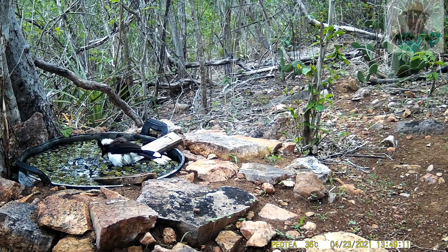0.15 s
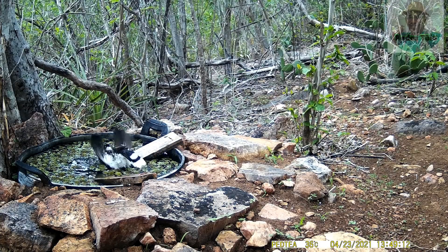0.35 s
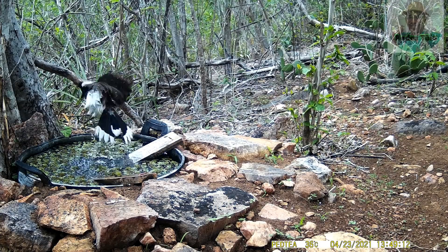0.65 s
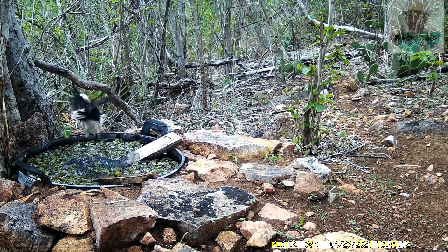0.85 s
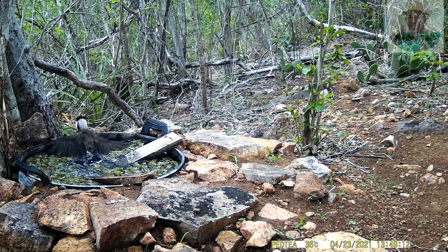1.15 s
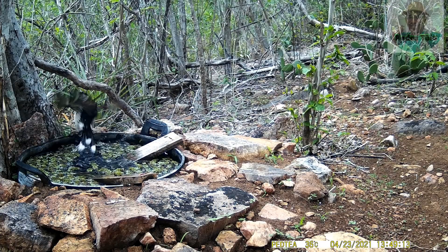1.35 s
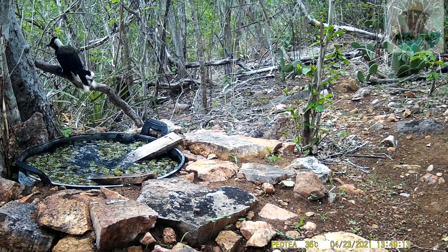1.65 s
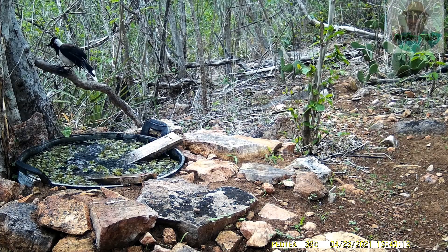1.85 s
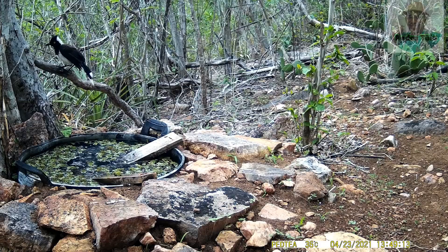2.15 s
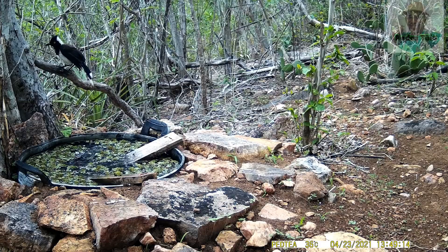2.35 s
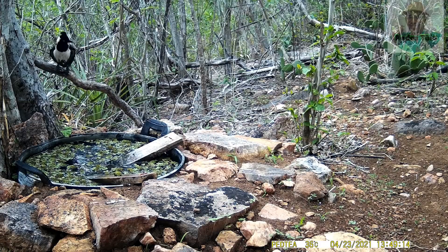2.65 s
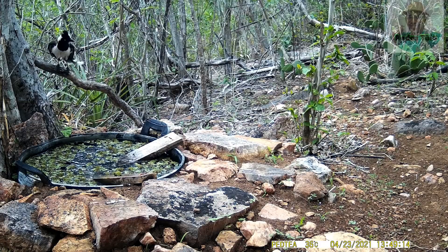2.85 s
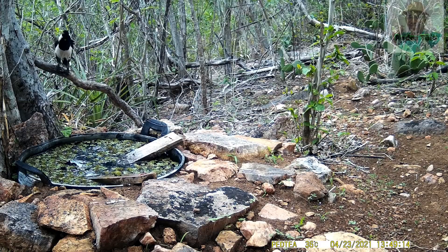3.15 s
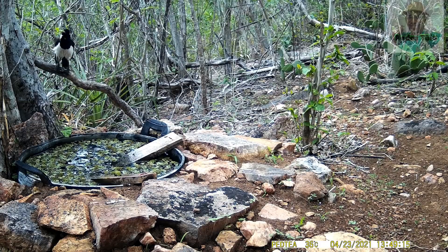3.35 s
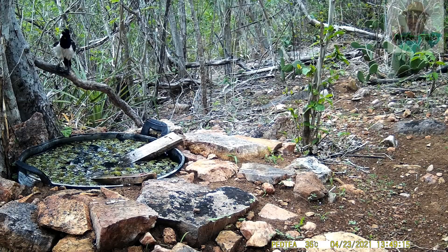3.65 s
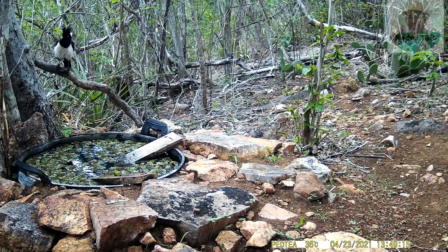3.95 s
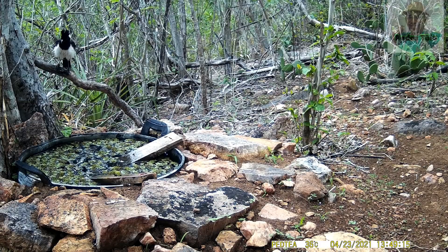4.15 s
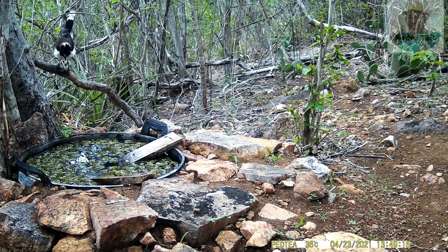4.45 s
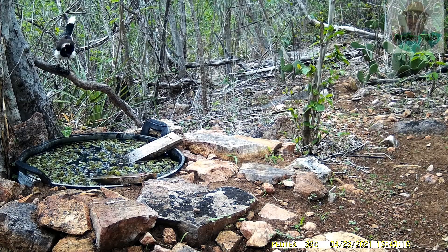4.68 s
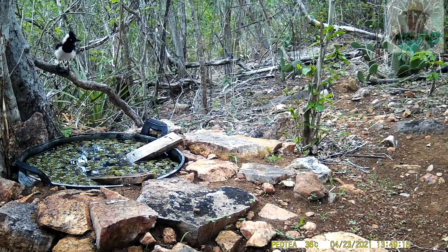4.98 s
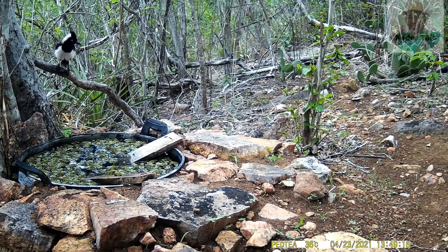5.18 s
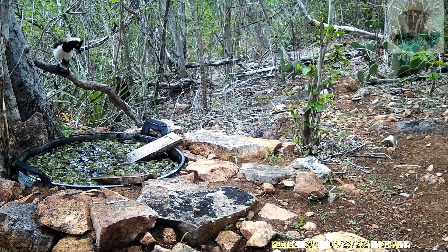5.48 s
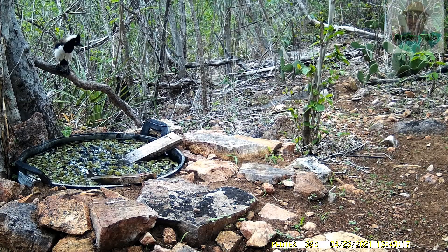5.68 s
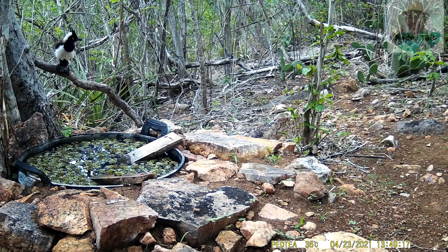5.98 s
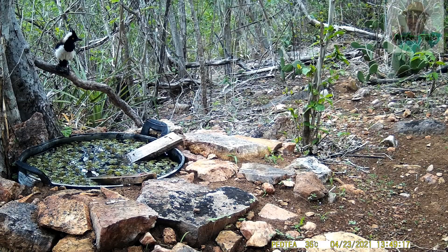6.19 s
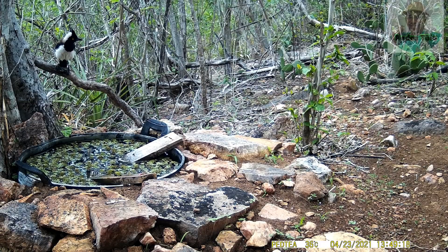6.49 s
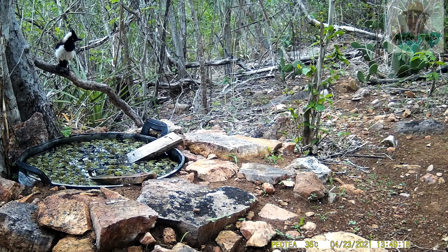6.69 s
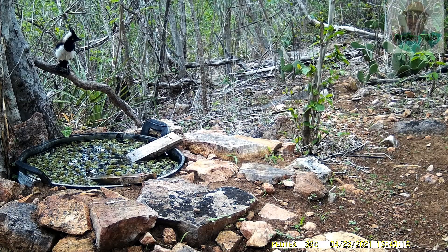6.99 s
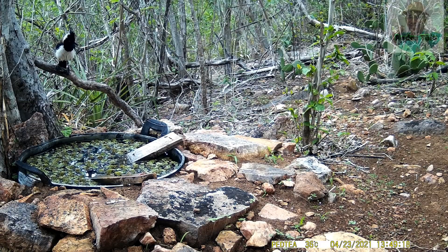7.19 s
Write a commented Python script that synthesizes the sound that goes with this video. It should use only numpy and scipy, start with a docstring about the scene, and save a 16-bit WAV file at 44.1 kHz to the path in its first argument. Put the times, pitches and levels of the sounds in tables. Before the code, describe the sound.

Soft wingbeats and quick watery plops, a quiet windy pause, a faint distant twitter, then two abrupt raspy jay yaps with brief woody echoes.

```python
"""A magpie-jay gives two short, loud yaps: two coupled oscillators whose sum and difference tones mix with rasp.
Before this it splashes out of a water basin in dry scrub: air pockets and small bubbles ring amid droplet noise,
and wingbeats push puffs of shaped noise. A faint twitter of gliding sines repeats until the yaps.
Discrete echoes and decaying diffuse noise stand for the trunks and rocks.
Light wind rumbles on a hissy microphone, and leaves stir softly."""
import sys
import numpy as np
from scipy import signal
from scipy.fft import rfft, irfft, next_fast_len
from scipy.io import wavfile

SR = 44100
rng = np.random.default_rng(int(sys.argv[2]) if len(sys.argv) > 2 else 0)


def wav_out(sig):
    """Save sig, one row per channel (or a flat mono array), as 16-bit PCM at SR to the path in sys.argv[1]."""
    wavfile.write(sys.argv[1], SR, np.round(np.clip(np.atleast_2d(sig).T, -1, 1) * 32767).astype(np.int16))


N = 323099

# Spectra list frequency_hz, relative density_db (power per Hz); the shaped signal is brought to rms 1.
# wind turbulence on the microphone: frequency_hz, density_db
WIND_SPECTRUM = [(12, 2), (22, 1.5), (35, 0.5), (50, -1.5), (80, -19), (130, -21), (300, -30.5), (800, -46)]
# air and microphone hiss, also used for leaves: frequency_hz, density_db
AIR_SPECTRUM = [(35, -43), (60, -3.5), (91, -4), (265, -12), (343, -14.5), (413, -15), (546, -17.5),
                (657, -18), (738, -19.5), (1050, -22), (1630, -23.5), (3840, -27), (12300, -28),
                (15500, -30)]
# air pushed by wings: frequency_hz, density_db
WING_SPECTRUM = [(45, -0.5), (90, -2.5), (200, -10), (500, -23.5), (1500, -27.5), (5000, -34.5)]
# droplets striking water: frequency_hz, density_db
SPRAY_SPECTRUM = [(300, -8), (700, -2), (1300, -4), (2100, -1), (3200, -7), (5000, -5), (8000, -13),
                  (15000, -18)]
# turbulent air in the throat: frequency_hz, density_db
RASP_SPECTRUM = [(300, -3), (850, -12), (1100, 1), (1350, -15), (1850, -5), (2350, 11.5), (3300, 1.5),
                 (5300, 9.5), (6600, -7), (8500, -2), (10500, 1), (12500, -18), (14200, -9), (16000, -20)]

# course of the wind: time_s, relative level_db
WIND_COURSE = [(0.0, -48.5), (0.3, -46.5), (0.35, -35), (0.39, -42), (0.86, -47), (0.96, -37), (1.14, -49),
               (1.16, -41), (1.94, -49), (2.43, -43), (2.9, -53), (3.0, -39), (3.24, -52), (3.38, -36),
               (3.49, -42), (3.57, -34), (4.02, -46.5), (4.1, -30.5), (4.16, -37.5), (4.39, -31.5),
               (4.49, -39), (5.12, -32.5), (5.45, -46), (5.59, -32), (5.63, -37.5), (6.45, -48),
               (6.53, -32), (6.61, -43), (6.71, -26.5), (7.04, -42), (7.18, -44.5), (7.33, -37)]
# soft rushes, like dry leaves stirring: start_s, level_db, attack_s, hold_s, t60_s
LEAF_RUSTLES = [(3.3, -51, 0.09, 0.14, .8), (4.676, -41.5, 0.054, .03, 0.85), (5.55, -51, 0.13, .06, .9),
                (6.7, -44, 0.084, 0.12, 0.77)]
# wingbeats, and wing flicks with the yaps: start_s, level_db
WINGBEAT_TIMES = [(0.526, -38.5), (0.706, -43.5), (0.945, -39.5), (1.166, -37), (1.245, -38), (1.314, -37),
                  (1.417, -41), (1.493, -37), (4.45, -33.5), (4.70, -39.5), (4.76, -38)]
# spray thrown by wings and feet, then shaken off on the perch: start_s, level_db, attack_s, t60_s
SPRAY_BURSTS = [(.615, -46, .012, 0.34), (.72, -50, 0.015, 0.11), (.87, -50.5, 0.05, 0.6),
                (1.10, -45.5, .04, 1), (1.182, -42, .006, .06), (1.25, -38, 0.0064, 0.14),
                (1.42, -46, 0.029, .1), (1.459, -41, .003, .05), (1.49, -45.5, 0.0087, 0.29),
                (2.68, -52, .004, .08), (3.355, -46.5, .004, .07)]
# air pockets in the basin: start_s, level_db, initial pitch_hz, t60_s
AIR_POCKETS = [(1.103, -36, 3520, .01), (1.129, -23.5, 2060, 0.014), (1.135, -30, 1010, 0.033),
               (1.141, -28, 1730, .015), (1.153, -29.5, 1600, .025), (1.163, -17, 713, 0.0098),
               (1.187, -29, 1300, 0.0096), (1.2263, -22, 1940, 0.013), (1.256, -23, 2120, 0.0031),
               (1.285, -33, 1900, .015), (1.385, -38, 2020, .018), (1.49, -34, 2300, 0.02)]
# echoes from ground, rocks and trunks: delay_s, relative level_db
ECHO_PATHS = [(.0085, -27), (0.014, -14.5), (0.0209, -18), (.033, -31), (0.054, -29.5)]
# repeats of the twitter phrase: start_s, strength_db added to each note
TWITTER_REPEATS = [(3.915, -2.5), (4.066, 1.5), (4.211, 0.5), (4.366, 2)]
# notes of the phrase: delay_s, length_s, start_hz, end_hz, relative level_db
TWITTER_NOTES = [(0, .04, 3680, 3580, -51), (0.031, .011, 5000, 4470, -45.5), (.04, .035, 4850, 4900, -56),
                 (.095, 0.027, 3090, 2750, -50)]
# thin slurs into the yaps and a soft one between them: start_s, length_s, start_hz, end_hz, level_db
LEAD_IN_SLURS = [(4.421, 0.011, 6560, 5700, -28.5), (4.425, 0.0085, 5550, 5270, -23),
                 (4.553, 0.028, 2450, 2280, -44), (4.641, 0.015, 5800, 4340, -30)]
# overtones of the low voice: multiple, level_db relative to the low voice
LOW_VOICE_OVERTONES = [(2, -22.5), (3, -22), (4, -35.5), (5, -28), (7, -28), (9, -21)]
# tones from coupled voices: low_multiple, high_multiple, level_db relative to the high voice
COUPLING_TONES = [(-1, 1, -24), (3, -1, -25), (2, 0, -29), (-1, 2, -30), (3, 0, -16), (0, 2, -15),
                  (2, 1, -29), (1, 2, -21.5), (2, 2, -33), (1, 3, -31), (0, 4, -44), (2, 3, -46),
                  (1, 4, -30), (2, 4, -25)]
# yaps: start_s, length_s, base low_hz, base high_hz, first_half_strength_db, second_half_strength_db,
# relative constant_rasp_db
YAP_CALLS = [(4.4332, 0.049, 1571, 2651, 0, 0.5, -28.5), (4.6523, 0.063, 1536, 2617, -5.5, -1.5, -35.5)]
# strokes of every yap (both voices, high, low, both again): delay_s, attack_s, hold_s, t60_s,
# relative low_voice_db, high_voice_db, sum_tone_db, rasp_db; high_pitch_lift (share)
YAP_STROKES = [(0, 0.0027, .008, 0.02, -19.5, -6, -8.5, -22, 0.022),
               (.008, .003, 0.01, .02, -26, -8.5, -24, -38, 0.023),
               (0.023, .006, .003, .08, -8, -33, -26, -42, .025),
               (0.045, 0.002, 0.0028, .05, -15.5, -12, -7.5, -31, 0.048)]

TIME = np.arange(N) / SR
AIR_DB = -45  # steady air and microphone hiss, before its flicker
DOWNSTROKE_S = 0.052
BUBBLES_PER_S, BUBBLE_CYCLES, BUBBLES_DB = 250, 16, -6  # total rate, cycles per 60 dB fall, level re droplets
STEM_SCATTER_HZ = 1500  # thin stems scatter little below this
LOW_OVERSHOOT, LOW_SETTLE_S = 0.075, 0.017  # the low voice starts sharp by this share and settles
GROWL = 0.18  # in the first stroke every other beat between the voices is stronger by this share
RELEASE_T60_S = 0.092  # end of a yap
CUTOFF_HZ = 15650


def from_db(db):
    """An amplitude ratio is ten to the power of its level over twenty."""
    return 10 ** (np.asarray(db) / 20)


def rms_one(x):
    """Division by the root mean square normalises signal power."""
    return x / np.sqrt(np.mean(x ** 2) + 1e-20)


def shaped(x, spectrum):
    """Linear filtering multiplies each frequency component by a gain; rms 1."""
    hz, density_db = np.transpose(spectrum)
    size = next_fast_len(N)
    bins = np.maximum(np.arange(size // 2 + 1) * SR / size, 1)
    gain = from_db(np.interp(np.log(bins), np.log(hz), density_db))
    gain *= np.minimum(bins / hz[0], 1) ** 2  # falls away below the first frequency
    return rms_one(irfft(rfft(x, size) * gain, size)[:N])


def noise(spectrum):
    """Turbulence is a random pressure with a characteristic spectrum; rms 1."""
    return shaped(rng.standard_normal(N), spectrum)


def drift(rate_hz):
    """Low-passed white noise wanders no faster than its bandwidth; rms 1."""
    lowpass = signal.butter(2, min(rate_hz, SR / 4), fs=SR, output="sos")
    wander = signal.sosfilt(lowpass, rng.standard_normal(N + SR))
    return rms_one(wander[SR:])  # drop the filter's first second


def phase_of(hz):
    """Phase is the time integral of angular frequency."""
    return 2 * np.pi * np.cumsum(hz) / SR


def swell(age, attack, hold, t60):
    """An excited source rises linearly, holds, then decays exponentially."""
    rise = np.clip(age / attack, 0, 1)
    return rise * from_db(-60 * np.clip((age - attack - hold) / t60, 0, 4))


def wind(wind_db, lumpy_db):
    """Turbulent pressure at a microphone makes a low rumble of fluctuating level."""
    time_s, level_db = np.transpose(WIND_COURSE)
    gust_db = np.interp(TIME, np.sort(time_s), level_db)
    return from_db(gust_db + wind_db + lumpy_db * drift(6.7)) * noise(WIND_SPECTRUM)


def air_and_leaves(flicker_db):
    """Independent noises add in power: steady hiss and leaf rushes share one spectrum."""
    leaves = sum(from_db(db) * swell(TIME - s, attack, hold, t60)
                 for s, db, attack, hold, t60 in LEAF_RUSTLES)
    level = np.hypot(from_db(AIR_DB), leaves)
    return level * from_db(flicker_db * drift(5.3)) * noise(AIR_SPECTRUM)


def scrub(x, echo_db, scatter_db, scatter_t60, tail_db, tail_t60, dull_hz):
    """Reflection and multiple scattering add delayed copies, quick scatter and a wood tail to direct sound."""
    age = np.arange(SR * 3 // 4) / SR
    response = np.zeros(len(age))
    for db, t60 in ((scatter_db, scatter_t60), (tail_db, tail_t60)):
        decay = np.exp(-np.log(1000) * age / t60)
        diffuse = rng.standard_normal(len(age)) * decay * np.minimum(age / 0.027, 1)
        response += from_db(db) * diffuse / np.sqrt(np.sum(diffuse ** 2))
    highpass = signal.butter(1, STEM_SCATTER_HZ, "high", fs=SR, output="sos")
    response = signal.sosfilt(highpass, response)
    for delay, db in ECHO_PATHS:
        response[round(delay * SR)] += from_db(db + echo_db)
    lowpass = signal.butter(1, min(dull_hz, SR * 0.45), fs=SR, output="sos")
    response = signal.sosfilt(lowpass, response)
    return x + signal.fftconvolve(x, response)[:N]


def slurs(rows, waver):
    """Frequency modulation of a sine gives whistles that swell, glide and fade."""
    out = np.zeros(N)
    wobble = 1 + waver * drift(300)
    for s, length, start_hz, end_hz, db in rows:
        span = round(s * SR) + np.arange(round(length * SR))
        pitch = np.geomspace(start_hz, end_hz, len(span)) * wobble[span]
        envelope = np.sin(np.linspace(0, np.pi, len(span)))
        out[span] += from_db(db) * envelope * np.sin(phase_of(pitch))
    return out


def twitter(waver):
    """Repetition of a gliding tone pattern forms a phrase whose strength varies."""
    rows = [(s + delay, length, start_hz, end_hz, db + strength_db)
            for s, strength_db in TWITTER_REPEATS
            for delay, length, start_hz, end_hz, db in TWITTER_NOTES]
    return slurs(rows, waver)


def wings():
    """Each downstroke displaces air: a half-sine push modulates turbulence."""
    push = sum(from_db(db) * np.sin(np.pi * np.clip((TIME - s) / DOWNSTROKE_S, 0, 1))
               for s, db in WINGBEAT_TIMES)
    return push * noise(WING_SPECTRUM)


def bubbles(low_hz, high_hz, count):
    """Bubbles resonate by size and lose a fixed share of amplitude per cycle; rms 1."""
    out = np.zeros(N)
    age = np.arange(SR // 30) / SR
    for hz in np.geomspace(low_hz, high_hz, count):
        born = rng.standard_normal(N) * (rng.random(N) < BUBBLES_PER_S / count / SR)
        ring = np.sin(2 * np.pi * hz * age) * from_db(-60 * age * hz / BUBBLE_CYCLES)
        out += signal.oaconvolve(born, ring)[:N]
    return rms_one(out)


def spray(drops_per_s, size_db):
    """Random impacts of uneven droplets make shot noise, and trapped bubbles ring with it."""
    sizes = from_db(size_db * np.minimum(rng.exponential(1, N), 4)) * rng.choice([-1, 1], N)
    drops = sizes * (rng.random(N) < drops_per_s / SR)
    thrown = sum(from_db(db) * swell(TIME - s, attack, 0, t60) for s, db, attack, t60 in SPRAY_BURSTS)
    ringing = from_db(BUBBLES_DB) * bubbles(low_hz=920, high_hz=3200, count=9)
    return thrown * (shaped(drops, SPRAY_SPECTRUM) + ringing)


def plops(rise):
    """Trapped air pockets are damped resonators, rising in pitch as they surface."""
    out = np.zeros(N)
    age = np.arange(SR // 20) / SR
    for s, db, hz, t60 in AIR_POCKETS:
        fade = np.exp(-np.log(1000) * age / t60)
        ring = np.sin(phase_of(hz * (1 + rise * (1 - fade))))
        out[round(s * SR) + np.arange(len(age))] += from_db(db) * fade * ring
    return out


def yap(row, low_jitter, high_jitter, shimmer_db, flutter_db, rasp_db):
    """Nonlinear coupling of the two sides of the syrinx yields overtones and sum and difference tones."""
    s, length, low_hz, high_hz, first_db, second_db, hoarse_db = row
    age = TIME - s
    efforts = np.array([swell(age - delay, attack, hold, t60)
                        for delay, attack, hold, t60, *_ in YAP_STROKES])
    *levels_db, lift = np.transpose(YAP_STROKES)[4:]
    strength_db = np.array([first_db, first_db, second_db, second_db])
    low_gain, high_gain, sum_gain, rasp_gain = from_db(levels_db + strength_db) @ efforts

    settling = 1 + LOW_OVERSHOOT * np.exp(-np.maximum(age, 0) / LOW_SETTLE_S)
    low = phase_of(low_hz * settling * (1 + low_jitter * drift(516)))
    high = phase_of(high_hz * (1 + lift @ efforts) * (1 + high_jitter * drift(352)))

    low_voice = np.sin(low) + sum(from_db(db) * np.sin(round(k) * low) for k, db in LOW_VOICE_OVERTONES)
    high_voice = np.sin(high) + sum(from_db(db) * np.sin(round(j) * low + round(k) * high)
                                    for j, k, db in COUPLING_TONES)
    high_and_sum = high_gain * high_voice + sum_gain * np.sin(low + high)
    voice = low_gain * low_voice + high_and_sum * from_db(flutter_db * drift(210))
    voice *= 1 + GROWL * efforts[0] * np.cos((high - low) / 2)

    rasp = (rasp_gain + from_db(hoarse_db)) * from_db(rasp_db) * noise(RASP_SPECTRUM)
    envelope = swell(age, 0.00095, length, RELEASE_T60_S)
    return envelope * (voice * from_db(shimmer_db * drift(650)) + rasp)


def scene():
    """Superposition: near and far sources with their scattered sound, wings, wind and hiss add linearly."""
    background = wind(wind_db=-0.5, lumpy_db=1.5) + air_and_leaves(flicker_db=0.62)
    # from farther off the scattered sound outweighs the direct one
    far = scrub(twitter(waver=0.056), echo_db=5.0, scatter_db=-1.0, scatter_t60=0.17,
                tail_db=-5, tail_t60=0.45, dull_hz=9000)
    water = plops(rise=0.06) + spray(drops_per_s=1300, size_db=2.5)
    jay = sum(yap(row, low_jitter=0.00705, high_jitter=0.014, shimmer_db=0.45, flutter_db=1.1, rasp_db=0.5)
              for row in YAP_CALLS)
    near = scrub(jay + slurs(LEAD_IN_SLURS, waver=0.012) + water, echo_db=-0.5, scatter_db=-16.0,
                 scatter_t60=0.22, tail_db=-29.5, tail_t60=0.5, dull_hz=16000)
    return (near + from_db(-0.5) * far + wings() + background)[None]


def record(dry):
    """Amplitude limiting clips the loudest peaks; a steep low-pass then removes the top."""
    steep = signal.ellip(14, 0.1, 90, CUTOFF_HZ, fs=SR, output="sos")
    return signal.sosfilt(steep, np.clip(dry, -0.92, 0.92))


dry = scene()
out = record(dry)
wav_out(out)
```